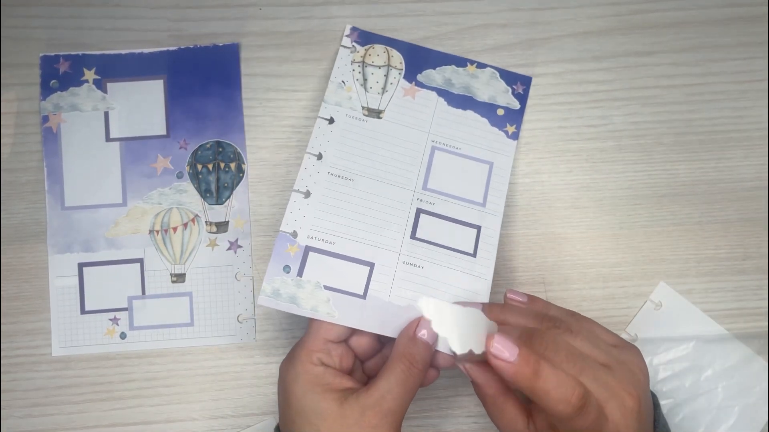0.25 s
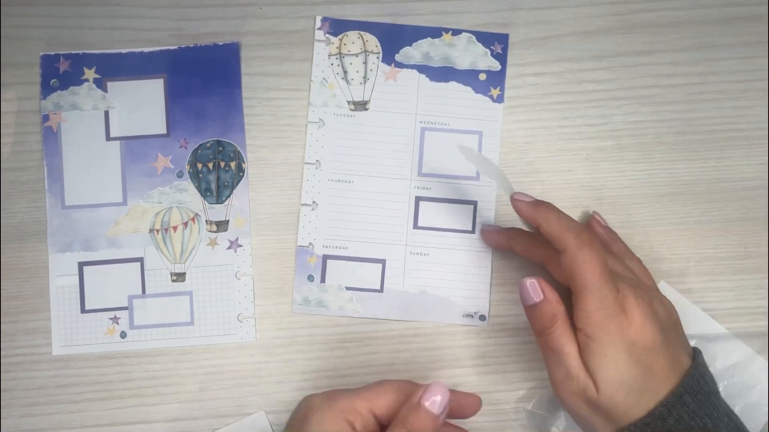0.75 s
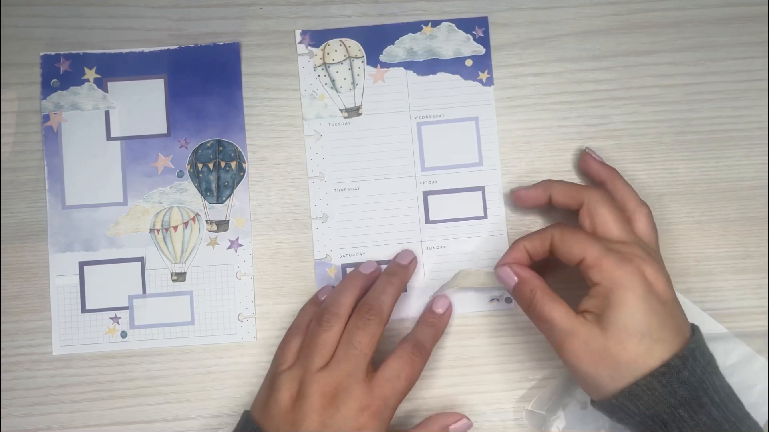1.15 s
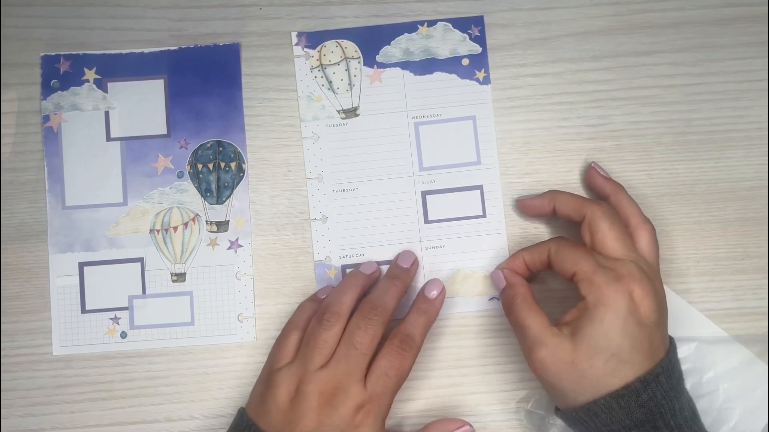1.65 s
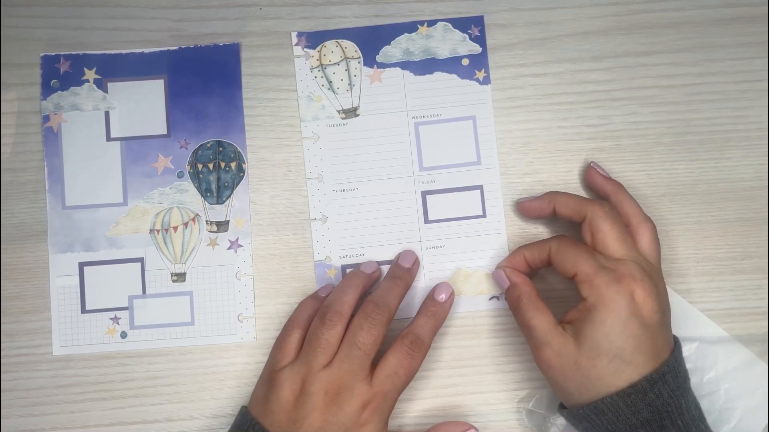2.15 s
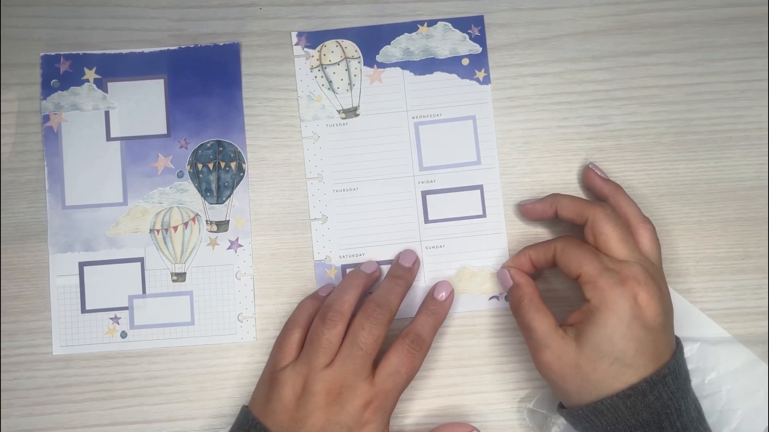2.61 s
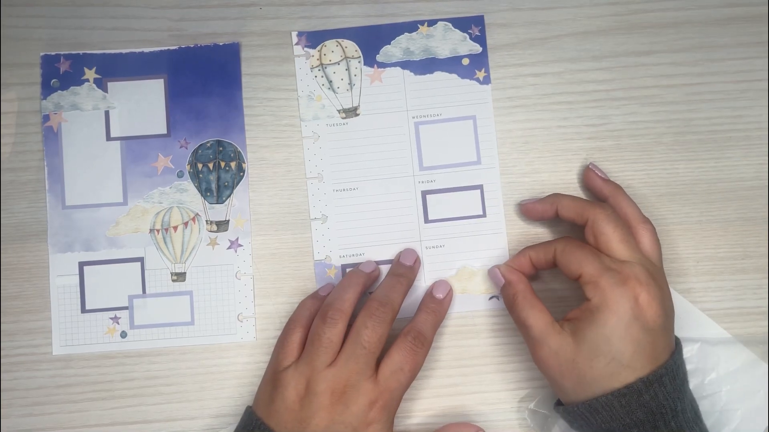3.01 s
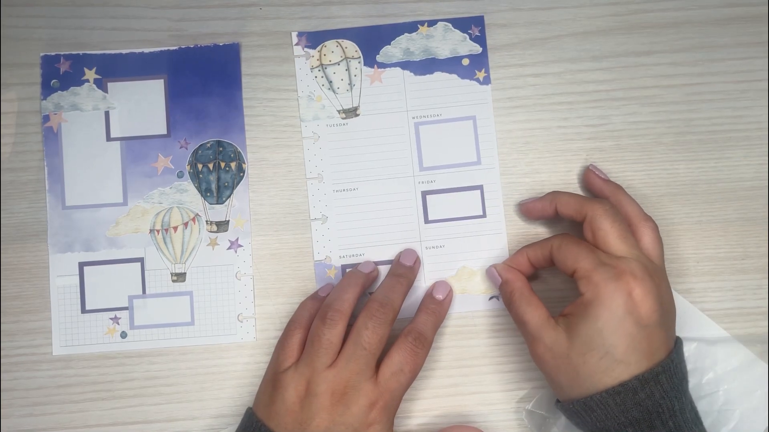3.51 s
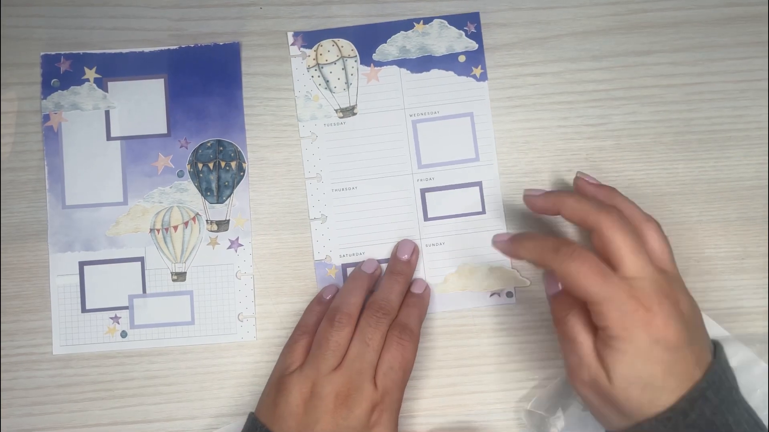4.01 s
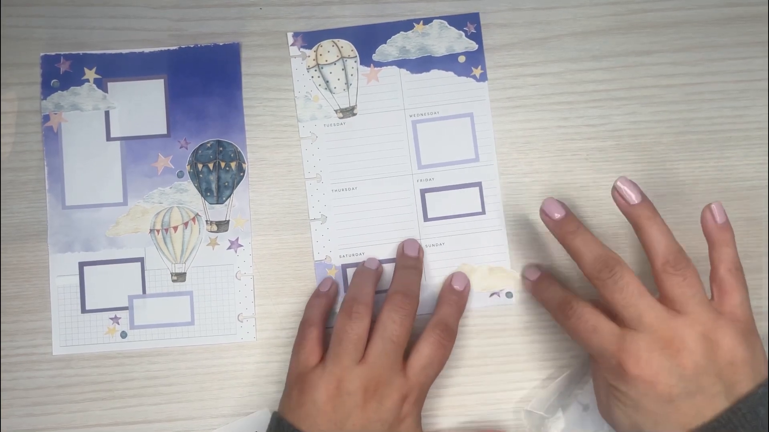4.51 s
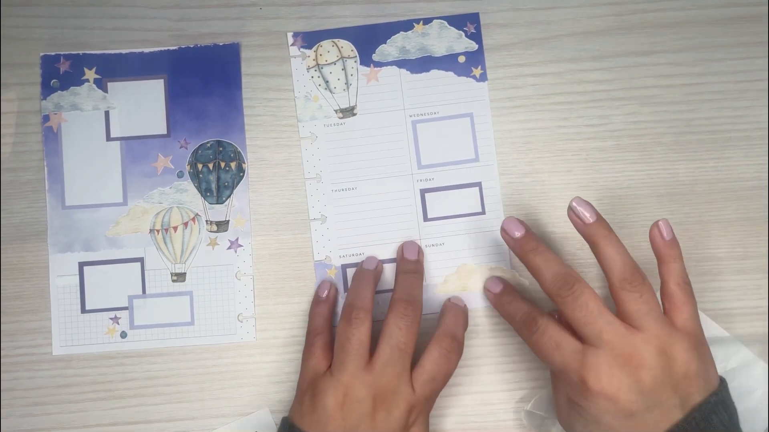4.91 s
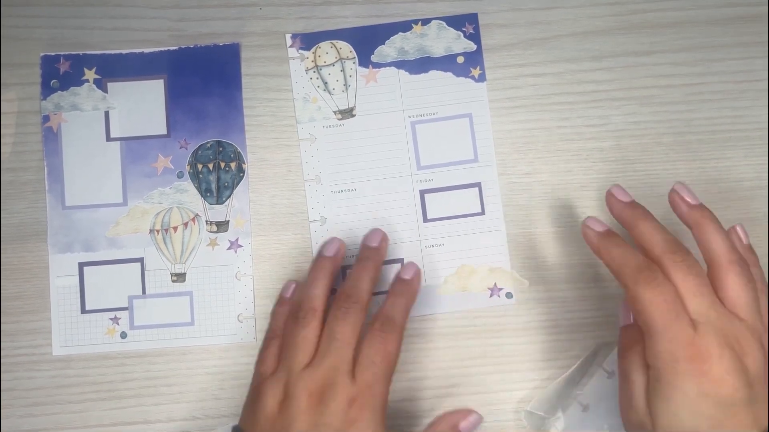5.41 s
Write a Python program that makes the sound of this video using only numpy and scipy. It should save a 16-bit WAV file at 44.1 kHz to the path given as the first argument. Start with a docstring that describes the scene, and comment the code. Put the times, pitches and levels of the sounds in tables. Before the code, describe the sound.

Dry paper crackles and a bright peeling snap, a page flop on wood, then sparse finger rubs, ticks and dull taps.

```python
"""Fingers rub a loose paper sheet in a quiet, faintly whistling room: countless slips make shaped noise.
Glue and paper snap as a sticker peels: each snap is a click and a decaying noise burst.
The page flutters and slaps onto a wooden desk, exciting resonances of the air pocket beneath it.
Fingers stroke the held page and knock the desk top, whose damped modes travel as bending waves.
Sparse echoes surround paper and desk, and two microphone ports set the sides apart in phase."""
import sys
import numpy as np
from scipy import signal
from scipy.fft import rfft, irfft, next_fast_len
from scipy.io import wavfile
from scipy.ndimage import uniform_filter1d

SR = 44100
rng = np.random.default_rng(int(sys.argv[2]) if len(sys.argv) > 2 else 0)


def bounce(signal):
    """Save signal as a 16-bit WAV file at the path given by the first command-line argument."""
    frames = np.transpose(np.atleast_2d(signal))
    limited = np.clip(frames, -1, 1)
    pcm = np.round(limited * 32767).astype(np.int16)
    wavfile.write(sys.argv[1], SR, pcm)


N = 249506

HELD_FROM_S = 1.5  # from here on the page counts as held down on the desk


def gain_of(db):
    """Decibel law: 20 dB is a factor of ten in amplitude."""
    return 10 ** (np.asarray(db) / 20)


def evened(x):
    """Power normalisation: scales to an rms of 1."""
    return x / np.sqrt(np.mean(x ** 2) + 1e-20)


def read(points, hz):
    """Interpolates a table linearly on a log-frequency axis, close to the ear's pitch scale."""
    f, value = np.transpose(points)
    return np.interp(np.log(hz + 1), np.log(f + 1), value)


def add(mix, s, sound):
    """Superposition: adds a sound into the mix from s seconds on."""
    part = mix[round(s * SR):][:len(sound)]
    part += sound[:len(part)]


def colour(x, points):
    """Linear filtering: multiplies the spectrum by a table of f/Hz, level/dB."""
    hz = np.fft.rfftfreq(len(x), 1 / SR)
    return irfft(rfft(x) * gain_of(read(points, hz)), len(x))


def grains(per_s, spread_db, share):
    """Shot noise: sparse random clicks of uneven size, mixed by share with smooth noise."""
    size_db = spread_db * np.minimum(rng.exponential(1, N), 4)
    clicks = gain_of(size_db) * (rng.random(N) < per_s / SR)
    clicks = evened(clicks * rng.choice([-1, 1], N))
    share = np.clip(share, 0, 1)
    return share * clicks + (1 - share) * rng.standard_normal(N)


def patchy(x, depth_db):
    """Time-varying filtering: patches of the spectrum swell and fade as contact wanders over the sheet."""
    z = signal.stft(x, nperseg=256, noverlap=192)[2]
    patches = uniform_filter1d(rng.standard_normal(z.shape), size=8, axis=0)
    patches = evened(uniform_filter1d(patches, size=16, axis=1))
    return signal.istft(z * gain_of(depth_db * patches), nperseg=256, noverlap=192)[1][:N]


def rubbing():
    """Friction noise: each stroke is countless slips of skin and fibre that swells, fades and stops."""
    # relative spectra of skin hiss, sheet rustle and desk scuff: f/Hz, level/dB
    hiss_shape, rustle_shape, scuff_shape = [(800, -59.5), (2500, -51.5), (5000, -22.5), (6500, -16.5),
                                             (7600, -5), (8600, -3), (9700, -2), (10700, 2.5), (11700, -5),
                                             (12700, -20.5), (13500, -59.5)], [(300, -61.5), (900, -14), (1800, -2.5),
                                                           (2500, -3), (3600, 2.5), (4600, 2), (5600, 0),
                                                           (7000, -6), (9000, -26), (12500, -54.5)], [(50, -30.5), (120, 3),
                                                                           (250, 7.5), (500, -3), (720, 1),
                                                                           (1000, -5), (1500, -6),
                                                                           (2400, -8.5), (4000, -41.5),
                                                                           (8000, -60)]
    # the loose sheet slides through the fingers: t/s, rise/s, length/s, skin hiss level/dB, rustle level/dB
    handling = [ (.0, 0.0016, .16, -78, -64), (0.153, 0.083, .13, -49, -51.5),
                (0.307, 0.0022, 0.051, -47, -40.5), (0.341, 0.039, 0.19, -55, -50),
                (0.431, 0.012, 0.055, -40, -52), (0.486, 0.028, 0.15, -52, -54.5),
                (0.591, 0.017, 0.067, -46.5, -50.5), (0.665, 0.057, 0.036, -35.5, -50),
                (0.691, 0.0016, 0.11, -54, -43.5), (0.793, 0.031, 0.17, -82, -71.5),
                (0.948, 0.0058, 0.052, -48.5, -53.5), (0.966, 0.035, 0.15, -48.5, -62),
                (1.093, 0.05, 0.11, -61, -55), (1.227, 0.023, 0.05, -42.5, -52),
                (1.285, 0.039, 0.044, -36, -47.5), (1.351, 0.028, 0.079, -48, -51.5),
                (1.432, .004, .1, -66, -66.5)]
    # fingertips stroke the held page: t/s, rise/s, length/s, skin hiss level/dB, desk scuff level/dB
    strokes = [ (1.558, .02, 0.079, -67, -77.5), (1.649, 0.025, .072, -48, -64),
               (1.944, 0.019, 0.055, -67.5, -84), (2.05, 0.07, 0.071, -69.5, -82.5),
               (2.313, 0.0036, 0.1, -52, -53.5), (2.467, 0.0062, 0.059, -70, -49.5),
               (2.629, 0.019, 0.035, -66, -85), (2.864, 0.023, .11, -53.5, -57.5),
               (3.111, 0.0055, 0.062, -58, -64), (3.481, 0.013, 0.013, -62, -88.5),
               (3.548, 0.0035, 0.045, -74, -48.5), (3.61, .006, .065, -92, -52),
               (3.711, .005, 0.046, -70.5, -60.5), (3.734, .003, 0.15, -51.5, -47.5),
               (3.812, 0.0071, 0.037, -35, -35.5), (3.859, 0.0043, 0.14, -59, -56),
               (3.982, 0.0044, 0.11, -74.5, -68.5), (4.127, 0.015, 0.045, -61, -50.5),
               (4.173, 0.025, 0.16, -46.5, -58), (4.321, 0.051, 0.1, -61, -66.5),
               (4.434, 0.0046, 0.046, -62, -42), (4.484, 0.016, 0.11, -57.5, -56.5),
               (4.698, .043, 0.079, -89, -71.5), (4.865, 0.0037, 0.072, -45, -69),
               (4.885, 0.012, 0.062, -79, -56), (4.987, 0.023, 0.083, -49.5, -47),
               (5.065, 0.023, 0.053, -54, -61), (5.198, 0.0046, 0.057, -61, -47.5),
               (5.264, 0.017, 0.063, -46, -51), (5.345, 0.044, 0.053, -54, -62),
               (5.397, 0.0044, 0.16, -85.5, -69), (5.62, 0.041, 0.059, -78, -53.5)]
    # fingers never quite still: hiss, rustle and scuff level/dB
    resting_db = (-80.5, -88.5, -80)
    resting_sway_db = 1.5  # rms
    loose_scuff_db = -12.5  # a loose sheet scuffs this far under its rustle
    held_rustle_db = -13  # a held page rustles this far under the mean of hiss and scuff
    # a sudden stroke fades further than a gentle one, and the scuff further than hiss and rustle
    sudden_fade_db, gentle_fade_db, sudden_s, scuff_fade = 20.5, 6, .01, 1.3
    start_db, stop_db, stop_s = -21.5, -19, .019  # how a stroke sets in and breaks off

    sway = uniform_filter1d(rng.standard_normal(N), size=3000)
    sway = evened(uniform_filter1d(sway, size=3000))
    levels = gain_of(np.array(resting_db)[:, None] + resting_sway_db * sway)
    loose = [(*when, hiss, rustle, rustle + loose_scuff_db) for *when, hiss, rustle in handling]
    held = [(*when, hiss, (hiss + scuff) / 2 + held_rustle_db, scuff) for *when, hiss, scuff in strokes]
    for s, rise_s, length_s, *peaks_db in loose + held:
        rise_s = np.clip(rise_s, .001, .9 * length_s)
        suddenness = np.exp(-rise_s / sudden_s)
        fade_db = gentle_fade_db + (sudden_fade_db - gentle_fade_db) * suddenness
        ends_db = (-fade_db, -fade_db, -scuff_fade * fade_db)
        t = np.arange(0, length_s + stop_s, 1 / SR)
        knots_s = [0, rise_s, length_s, length_s + stop_s]
        for level, db, end_db in zip(levels, peaks_db, ends_db):
            stroke_db = np.interp(t, knots_s, [start_db, 0, end_db, stop_db + end_db])
            add(level, s, gain_of(db + stroke_db))

    slips = patchy(grains(1500, 12.0, 0.16) + 0.2 * grains(180, 8.9, 1), 3.5)
    bumps = slips + 0.28 * grains(250, 1.2, 0.9)  # coarser catches drag the whole sheet over the wood
    hiss = levels[0] * evened(colour(slips, hiss_shape))
    rustle = levels[1] * evened(colour(slips, rustle_shape))
    scuff = levels[2] * evened(colour(bumps, scuff_shape))
    return hiss + rustle + scuff


def room_tone():
    """Stationary noise: air and rumble, partly coherent between the sides, drift in spectral patches."""
    tone_shape = [(30, 12), (45, 8.5), (95, 1.5), (200, -5), (400, -11), (860, -14.5), (1300, -19),
                  (2300, -33.5), (4200, -36.5), (6300, -42), (9400, -51), (11800, -32), (12800, -78.5),
                  (14000, -62.5)]  # relative spectrum of air and rumble: f/Hz, level/dB
    likeness = [(60, 0.95), (200, 0.98), (400, 0.17), (1000, 0.033), (4000, 0.22), (5500, 0.3),
                (12000, 0.32)]  # coherence of left and right: f/Hz, likeness (0 to 1)
    tone_db, whistle_db = -56.5, -87.5  # rms levels
    whistle_hz, whistle_width_hz = 5500, 150

    frames, hz = N // 256 + 5, np.fft.rfftfreq(1024, 1 / SR)
    a, b, c, d, patches = rng.standard_normal((frames, 513, 5)).T
    patches = uniform_filter1d(patches, 10, 0)
    patches = evened(uniform_filter1d(patches, 14, 1))
    same = np.clip(read(likeness, hz), -1, 1)[:, None]
    left, other = a + 1j * b, c + 1j * d
    z = np.array([left, same * left + np.sqrt(1 - same ** 2) * other])
    z *= gain_of(read(tone_shape, hz)[:, None] + 1.2 * patches)
    air = evened(signal.istft(z, nperseg=1024, noverlap=768)[1][:, :N])

    edges_hz = [whistle_hz - whistle_width_hz / 2, whistle_hz + whistle_width_hz / 2]
    band = signal.butter(2, edges_hz, "band", fs=SR, output="sos")
    whistle = evened(signal.sosfilt(band, rng.standard_normal(N)))
    return gain_of(tone_db) * air + gain_of(whistle_db) * whistle


def snaps():
    """Sudden release: each snap or pop is a tick and a dying noise burst, dull or bright by what lets go."""
    snap_rows = [(0.066, -56, -70), (.241, -34.5, -45), (0.2905, -35, -34), (.2942, -26, -30),
                 (0.2974, -9, -10), (0.3453, -35.5, -60), (0.3736, -30.5, -39), (0.4135, -32, -63),
                 (0.4347, -48, -38), (0.4449, -11, -52), (0.4526, -25, -37), (.534, -22.5, -39),
                 (.992, -32, -63), (1.2487, -29, -36.5), (1.289, -35, -58), (1.4824, -47, -64),
                 (1.6557, -24.5, -50), (1.6772, -41, -45.5), (1.6863, -42.5, -70), (2.3151, -37, -36),
                 (2.4721, -42, -33), (2.654, -55.5, -75.5), (2.8937, -39, -58), (2.9265, -49, -35.5),
                 (3.1229, -44, -54), (3.1277, -52, -47), (3.4246, -80.5, -46), (3.5048, -66.5, -76),
                 (3.5518, -62, -45), (3.6018, -78, -36), (3.6213, -81, -40), (3.634, -81, -40),
                 (3.7056, -54.5, -72.5), (3.724, -37, -82), (3.7429, -21.5, -25.5), (3.9443, -51.5, -64),
                 (3.9801, -46.5, -61), (4.1128, -51, -45), (4.1415, -27, -30), (4.3091, -38, -54),
                 (4.4374, -36, -49), (4.4404, -50, -27.5), (4.8691, -35.5, -54), (5.202, -34, -38)]  # snaps of glue, paper and nails: t/s, treble level/dB, low level/dB
    pop_rows = [(0.724, -38), (0.7432, -42), (.949, -43), (1.1529, -29.5), (1.1622, -40), (2.4229, -55.5)]  # the sheet buckles with a papery pop: t/s, level/dB
    knots_hz = [120, 400, 1500, 2200, 4500, 6000, 11500, 12600, 14500]  # knots of a snap's spectrum: f/Hz
    pop_treble_db, pop_low_db = -18, 0.5  # relative to the middle of a pop
    loose_middle_db, held_middle_db = -5, -10  # middle under the mean of treble and low
    loose_bass_db, held_bass_db = -7, 1  # a loose sheet gives a snap less bass
    body_t60_s, treble_t60_s = .014, .009  # the body of a snap outlasts its treble

    rows = []
    for s, high_db, low_db in snap_rows:
        middle_db = (high_db + low_db) / 2 + (loose_middle_db if s < HELD_FROM_S else held_middle_db)
        rows.append((s, high_db, middle_db, low_db))
    rows += [(s, db + pop_treble_db, db, db + pop_low_db) for s, db in pop_rows]

    out, t = np.zeros(N), np.arange(2048) / SR
    noise = rng.standard_normal((len(rows), 2048))
    for burst, (s, high_db, middle_db, low_db) in zip(noise, rows):
        bass_db = low_db + (loose_bass_db if s < HELD_FROM_S else held_bass_db)
        body_db = [low_db - 26.0, bass_db, low_db, middle_db, middle_db,
                   middle_db - 16.5, middle_db - 34.5, -120, -120]
        treble_db = [-120, -120, -120, high_db - 39, high_db - 21.5,
                     high_db - 5.0, high_db + 4.0, high_db - 15.0, high_db - 34.0]
        for t60, shape_db in (body_t60_s, body_db), (treble_t60_s, treble_db):
            part = burst * gain_of(-60 * t / t60) * np.minimum(t / .0003, 1)
            part[10] += 3.5  # the first tear
            part /= np.sqrt(np.mean(part[:132] ** 2))  # rms 1 over the first 3 ms
            # 64 samples of lead leave room for the filter to ring ahead of the onset
            add(out, s - 64 / SR, colour(np.roll(part, 64), list(zip(knots_hz, shape_db))))
    return out


def slap():
    """Cavity resonance: uneven flaps and claps of the page excite the air pocket between sheet and desk."""
    pocket = [(1550, 250, -16), (1960, 120, 5.5), (2140, 130, 4), (2674, 500, -6), (3200, 300, -5),
              (3600, 180, 7), (3900, 300, 0), (6640, 1900, -18), (10500, 2500, -14)]  # resonances of the air pocket: f/Hz, width/Hz, level/dB
    clap_rows = [(.6945, -22, 0.5), (0.6977, -22.5, 2.5), (0.701, -40, 2)]  # bursts of air at landing: t/s, drive level/dB, tilt/(dB per octave)
    flutter_tilt_db = (-9, 1)  # flutter brightens: tilt at start, landing/(dB per octave)
    flutter_s, flutter_rise_s, flutter_db = .658, .008, -38.5  # onset, rise and drive level
    clap_rise_s, clap_t60_s = .001, 0.016

    t, landing_s = np.arange(N) / SR, clap_rows[0][0]
    rise = np.clip((t - flutter_s) / flutter_rise_s, 0, 1) ** 2
    flutter = gain_of(flutter_db) * rise * (t < landing_s)
    # a clap is a dense burst of air, the flutter separate flaps
    claps = grains(1500, 2.0, 0.2)
    flaps = flutter * grains(1500, 3.0, 0.69)
    parts = [(flaps, np.interp(t, [flutter_s, landing_s], flutter_tilt_db))]
    for s, db, tilt_db in clap_rows:
        since = np.maximum(t - s, 0)
        envelope = np.minimum(since / clap_rise_s, 1) * gain_of(db - 60 * since / clap_t60_s)
        parts.append((claps * envelope, tilt_db))

    rung = 0
    for hz, width, mode_db in pocket:
        pole = np.exp((2j * np.pi * hz - np.pi * width) / SR)
        octaves = np.log2(hz / 2800)  # the tilt pivots here
        tilted = sum(drive * gain_of(mode_db + tilt_db * octaves) for drive, tilt_db in parts)
        rung += signal.lfilter([np.sqrt(1 - abs(pole) ** 2)], [1, -pole], tilted).imag
    return colour(rung, [(700, -32), (1400, -5.0), (12000, 7), (13500, -26.5)])


def knocks():
    """Modal excitation: a fingertip pushes the desk top; long, soft contacts favour its low modes."""
    knock_rows = [(.696, -24.5, 0.0036), (0.847, -43.5, 0.0016), (.955, -41, .003), (1.001, -31.5, 0.0032),
                  (2.318, -32.5, 0.0017), (2.469, -36, 0.0021), (2.892, -33.5, 0.0019),
                  (3.425, -44, 0.0018), (3.554, -50, .002), (3.601, -39, 0.0017), (3.619, -42, 0.002),
                  (3.636, -39, 0.0014), (3.742, -21.5, 0.0022), (3.816, -46, 0.005), (4.146, -31.5, 0.0039),
                  (4.182, -37.5, 0.0053), (4.442, -16, 0.0034), (4.49, -37.5, 0.0037),
                  (4.892, -42.5, 0.00354), (4.915, -38, 0.0008), (4.939, -41, 0.00089),
                  (4.994, -40.5, 0.0023), (5.177, -38.5, 0.0055), (5.207, -20.5, 0.0039),
                  (5.278, -37.5, 0.004), (5.632, -37.5, 0.0014)]  # finger pushes: t/s, level of the impulse/dB, contact/s
    desk_modes = [(66.3, -32.5, 0.54), (97, -14.5, 0.23), (118, -5, 0.077), (137.7, -4.5, 0.088),
                  (178, -17, 0.24), (236, -4, 0.019), (379.6, -24, 0.02), (721, -53, 0.026)]  # modes of the desk top: f/Hz, level/dB, t60/s
    desk_delay_s = .004  # travel time of a 100 Hz bending wave from the page to the phone stand

    force, t = np.zeros(N), np.arange(SR // 2) / SR
    for s, db, contact_s in knock_rows:
        push = np.hanning(round(np.clip(contact_s, .0003, .02) * SR))
        add(force, s, gain_of(db) * push / push.sum())
    ring = sum(gain_of(db - 60 * t / t60) * np.sin(2 * np.pi * hz * t) for hz, db, t60 in desk_modes)
    # bending waves run slower the lower they are, so each knock arrives as a falling sweep
    hz = np.fft.rfftfreq(len(t), 1 / SR)
    dispersion = np.exp(-4j * np.pi * desk_delay_s * 10 * np.sqrt(hz))
    ring = irfft(rfft(ring) * dispersion, len(t))[:SR // 3]
    return signal.oaconvolve(force, -ring / abs(ring).max())[:N]


def echoes(x):
    """Reverberation: sparse random-sign taps, each band decaying at its own rate, partly shared by the sides."""
    decay = [(300, 0.17), (1500, 0.042), (5000, 0.05), (12000, 0.081)]  # room echo: f/Hz, t60/s
    taps = np.zeros((2, SR // 2))
    # one tap at a random place in every 20 samples
    jitter = rng.integers(0, 20, (2, (SR // 2 - 61) // 20))
    at = np.arange(60, SR // 2 - 20, 20) + jitter
    np.put_along_axis(taps, at, rng.choice([-1., 1.], at.shape), 1)
    hz, t, z = signal.stft(taps + .85 * taps[::-1], SR, nperseg=128)
    z = z * gain_of(-60 * t / read(decay, hz)[:, None])
    tail = signal.istft(z, SR, nperseg=128)[1]
    return signal.fftconvolve(x[None], tail / np.linalg.norm(tail[0]), axes=1)[:, :N]


def scene():
    """Superposition: direct paper and desk sounds, their echoes and the room tone add linearly."""
    paper = rubbing() + snaps() + slap()
    desk = knocks()
    reflected = gain_of(-10.0) * echoes(paper) + gain_of(-16) * echoes(desk)
    return paper + desk + reflected + room_tone()


def record(dry):
    """Interchannel phase: two ports part the sides; then come a bass cut, soft limiting and a band limit."""
    ports = [(0, 0), (1380, 0), (2400, .4), (3450, .9), (4000, 1.1), (4570, 1.9), (5250, 5.1), (5680, 6.2),
             (6300, 6.6), (7580, 8.2), (8600, 9.2), (9650, 9.75), (10700, 10.85), (12500, 12.56)]  # microphone ports: f/Hz, phase by which left leads/rad
    lean = [(60, -.5), (380, -1.5), (1300, -.3), (4400, 0)]  # balance of the sides: f/Hz, left minus right level/dB
    low_cut_hz, edge_hz = 51.8, 16400

    size = next_fast_len(N + 4096)
    hz = np.fft.rfftfreq(size, 1 / SR)
    # each side takes half of the difference, in opposite directions
    half = gain_of(read(lean, hz) / 2) * np.exp(.5j * read(ports, hz))
    ported = irfft(rfft(dry, size) * np.array([half, 1 / half]), size)[:, :N]
    ported = signal.sosfilt(signal.butter(4, low_cut_hz, "high", fs=SR, output="sos"), ported)
    ported = .9 * np.tanh(ported / .9)
    low_pass = signal.firwin(511, edge_hz, window=("kaiser", 9), fs=SR)
    return signal.oaconvolve(ported, low_pass[None], "same")


dry = scene()
out = record(dry)
bounce(out)
```